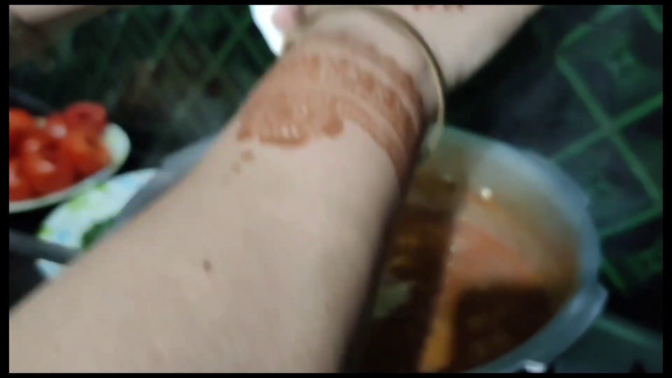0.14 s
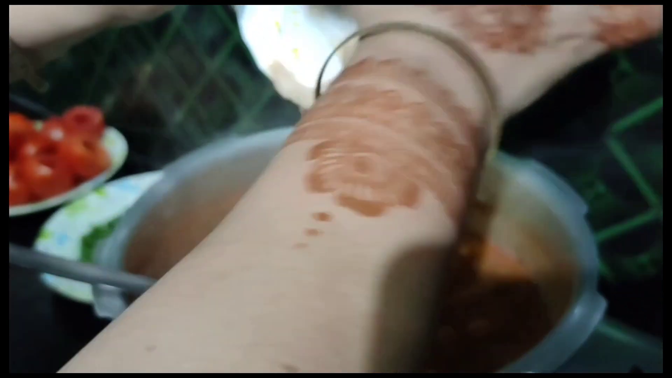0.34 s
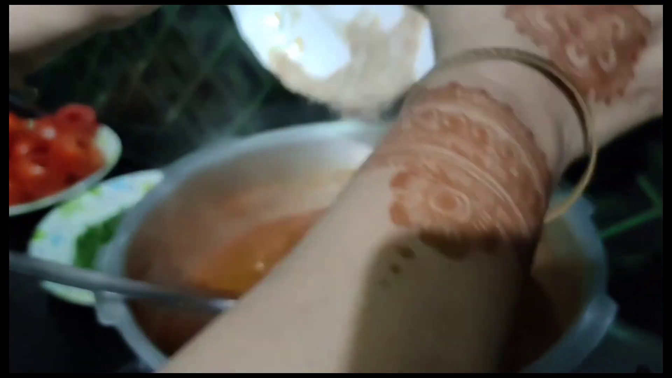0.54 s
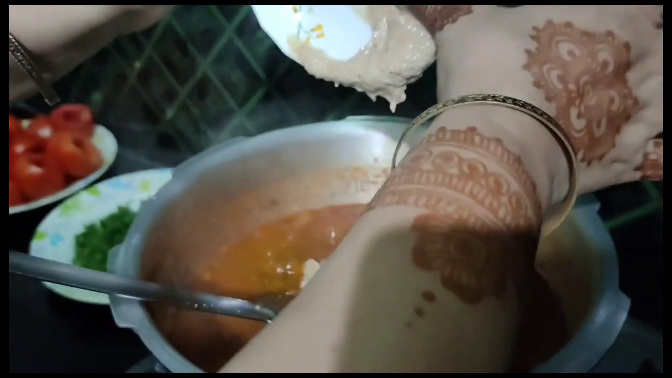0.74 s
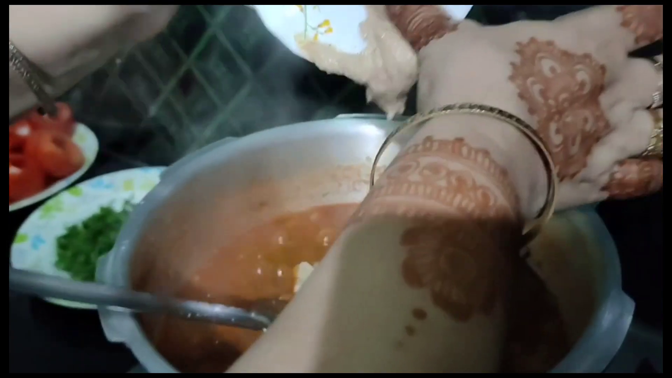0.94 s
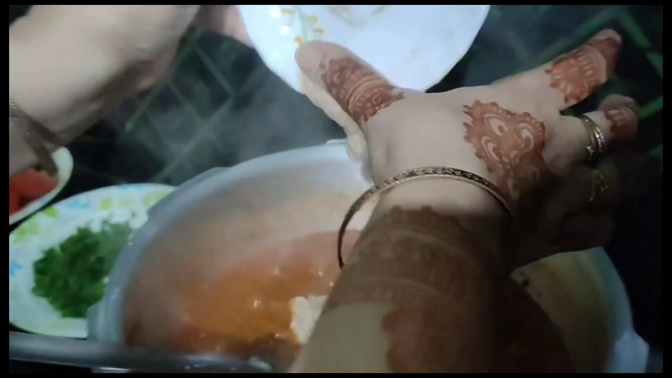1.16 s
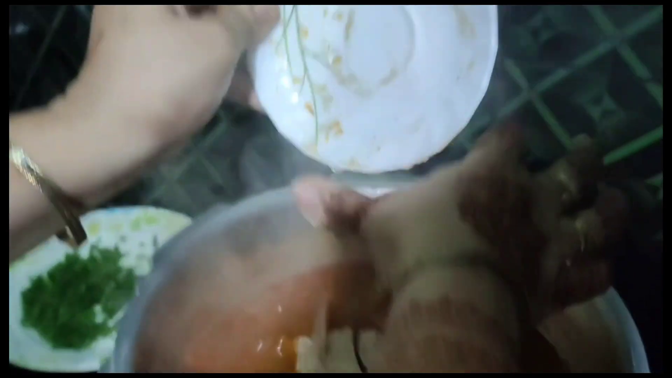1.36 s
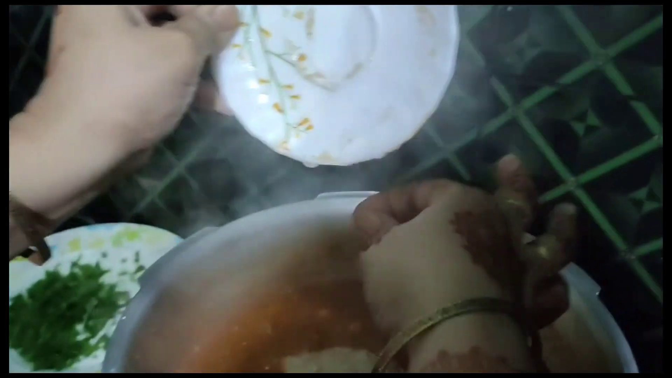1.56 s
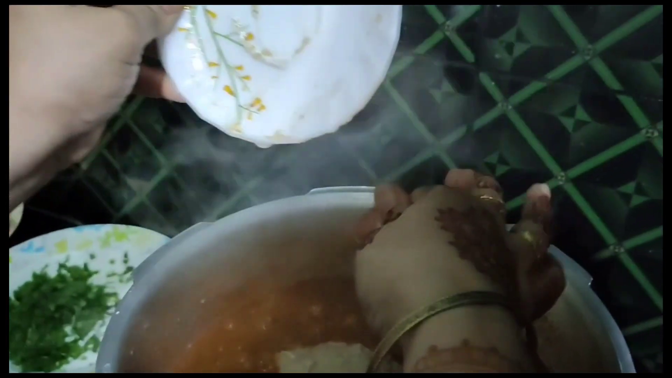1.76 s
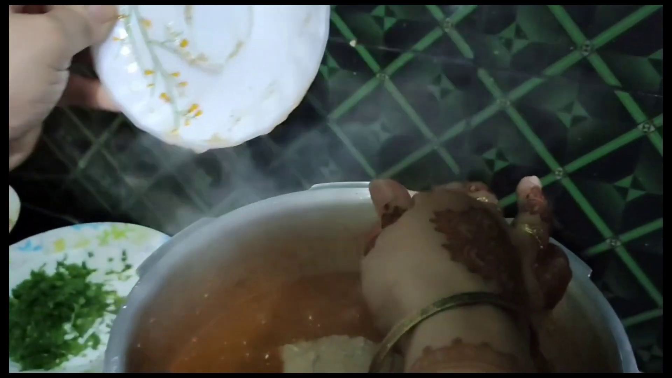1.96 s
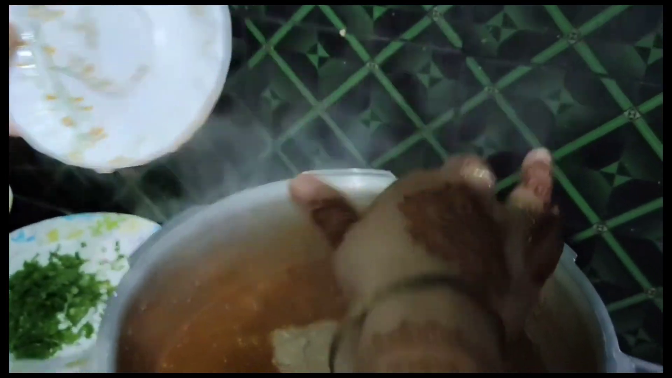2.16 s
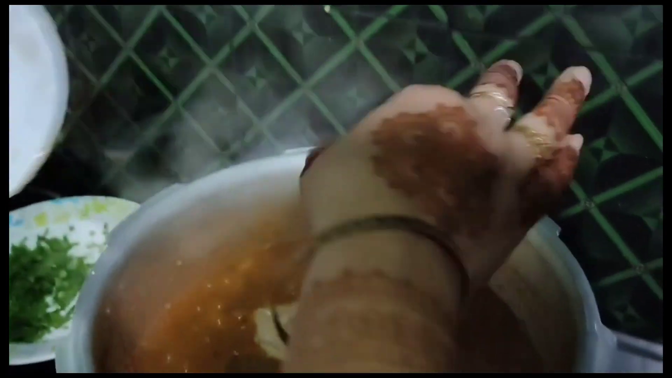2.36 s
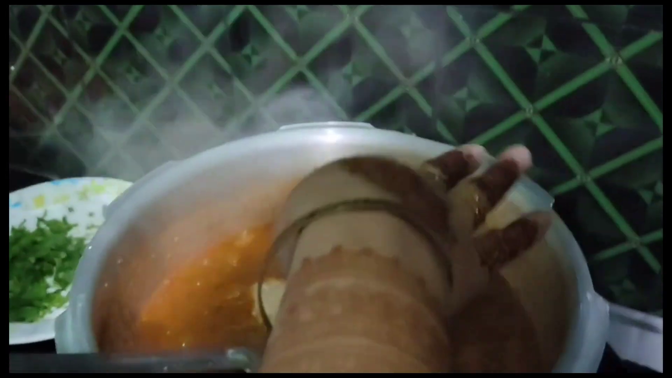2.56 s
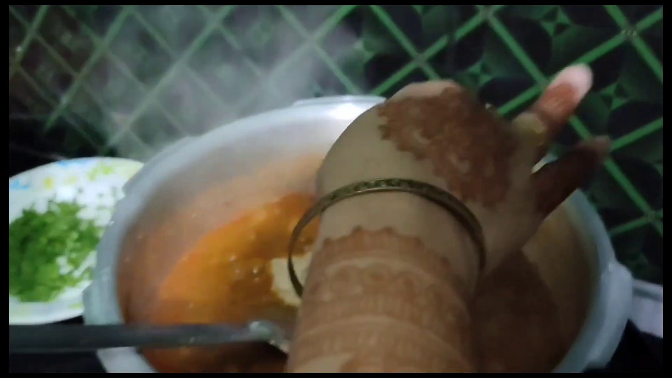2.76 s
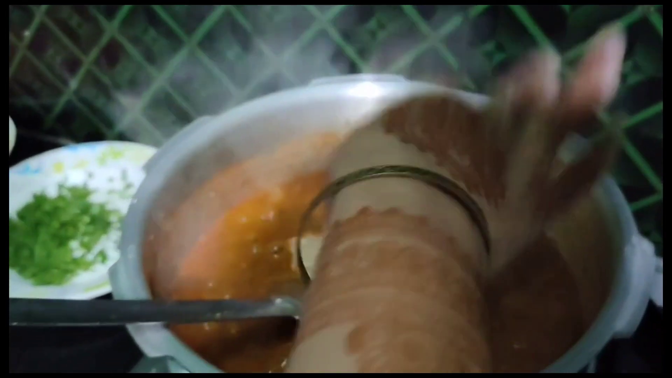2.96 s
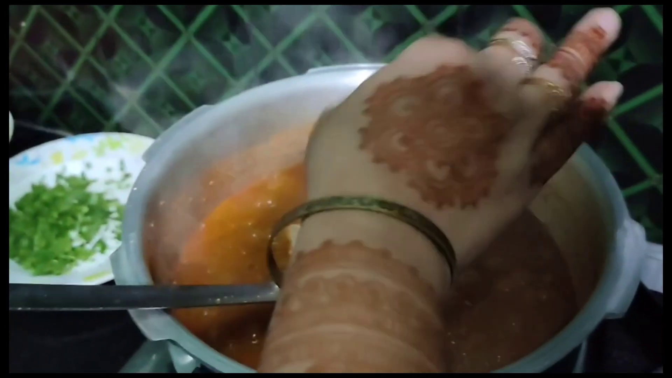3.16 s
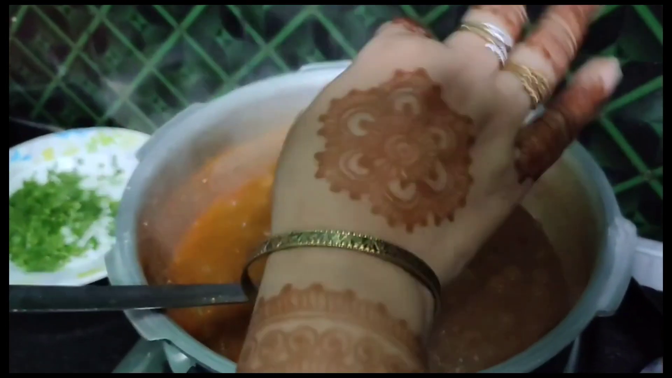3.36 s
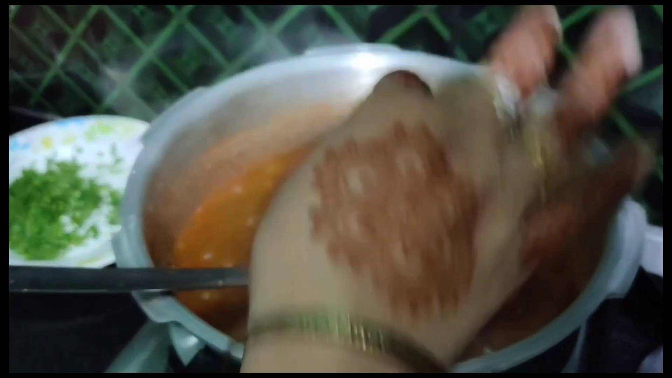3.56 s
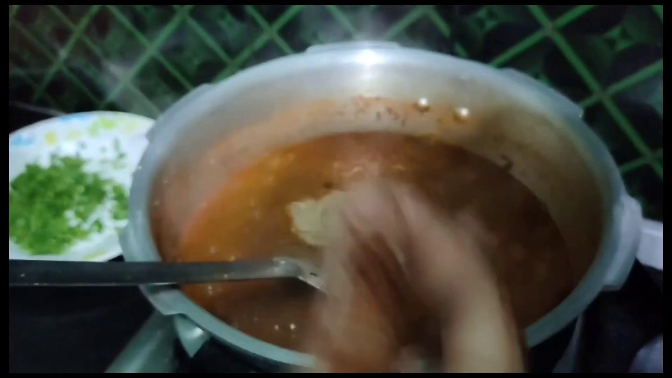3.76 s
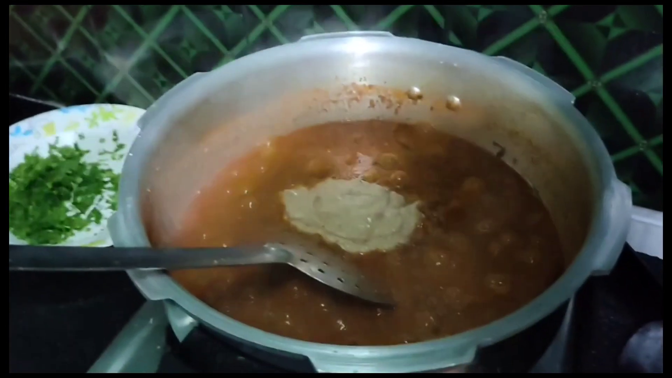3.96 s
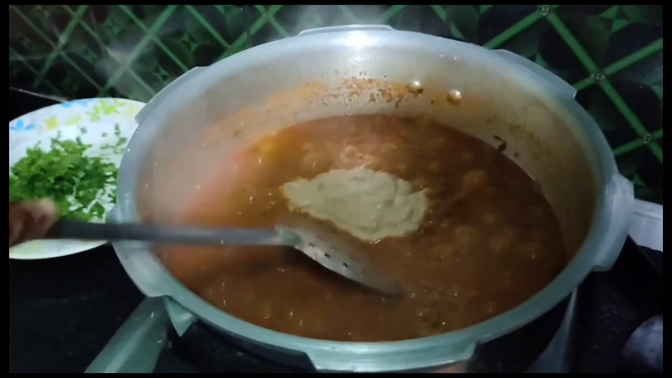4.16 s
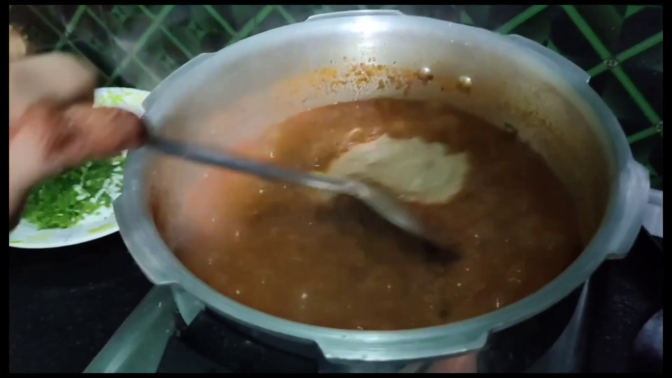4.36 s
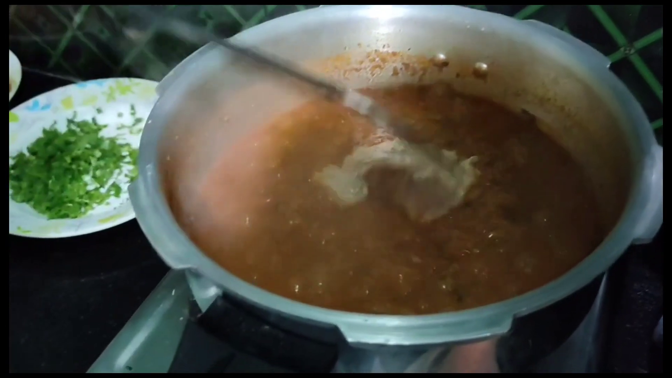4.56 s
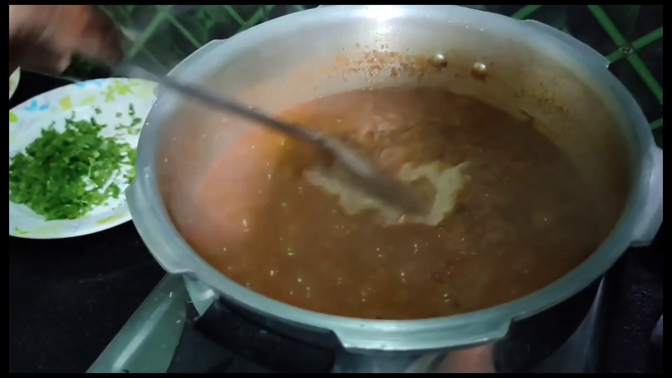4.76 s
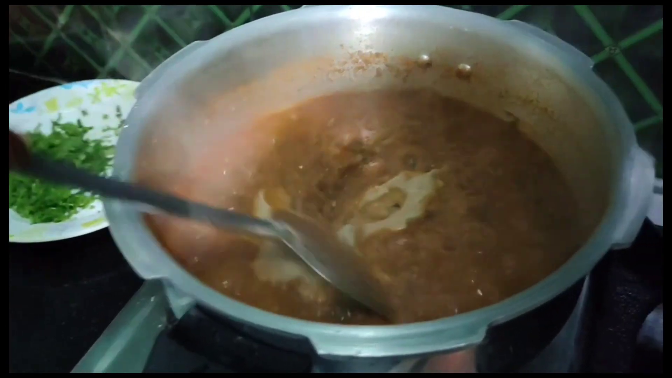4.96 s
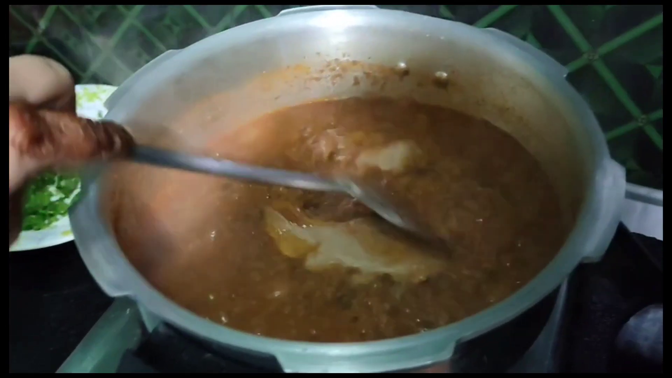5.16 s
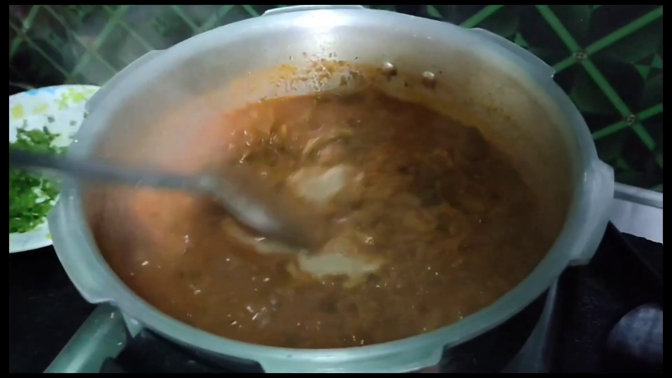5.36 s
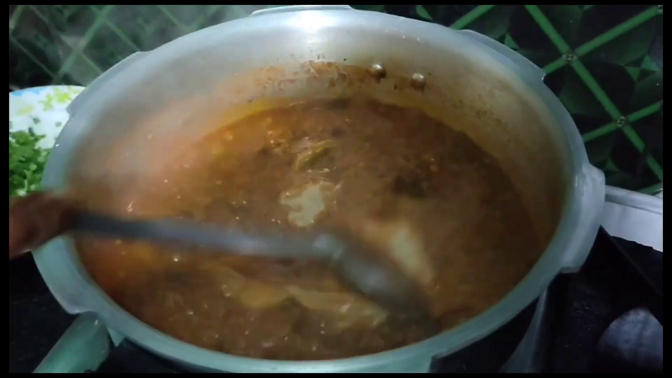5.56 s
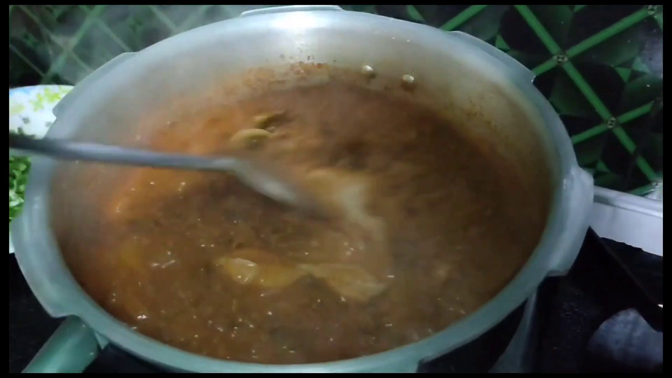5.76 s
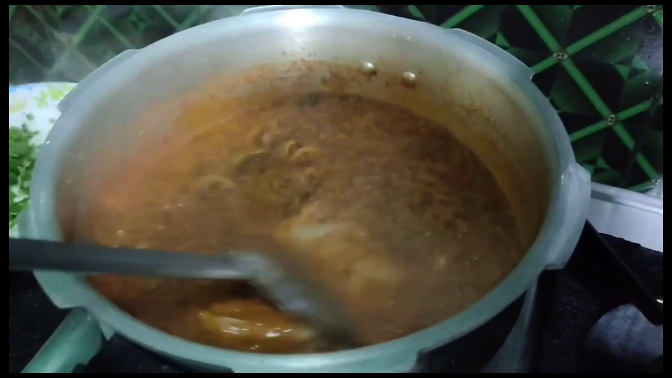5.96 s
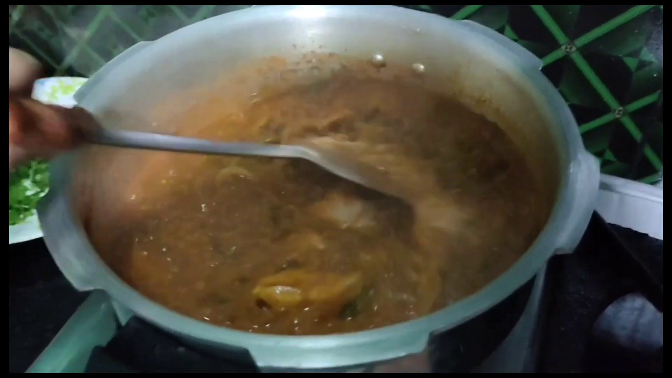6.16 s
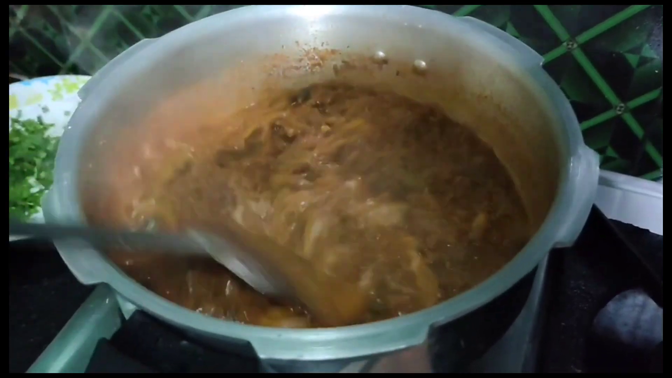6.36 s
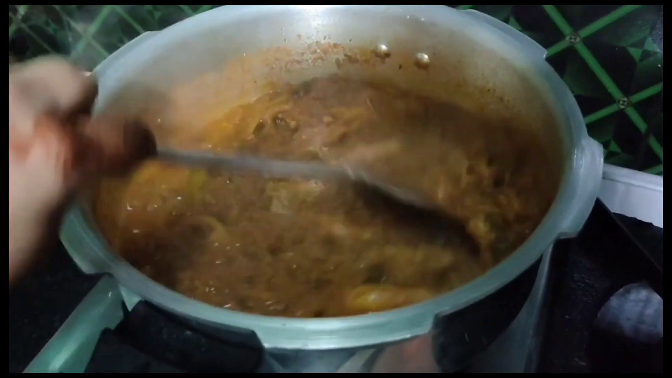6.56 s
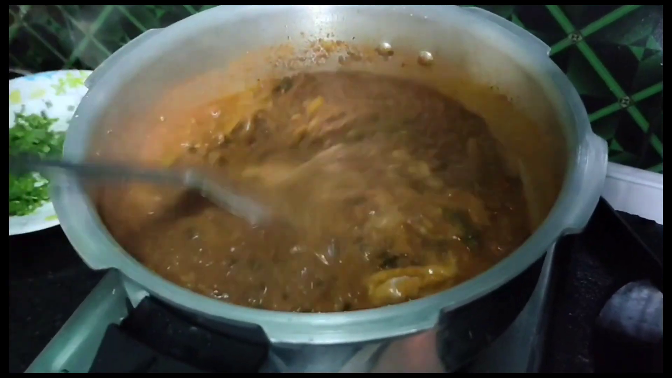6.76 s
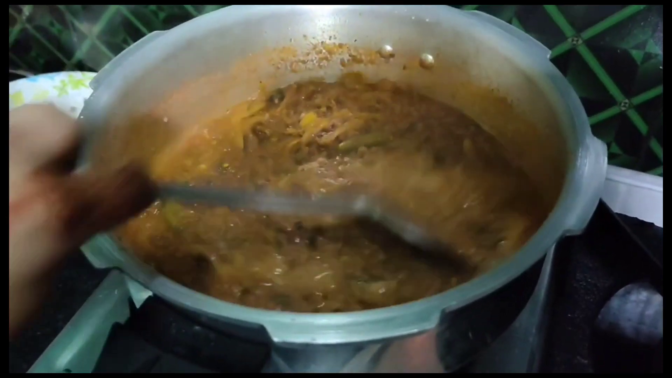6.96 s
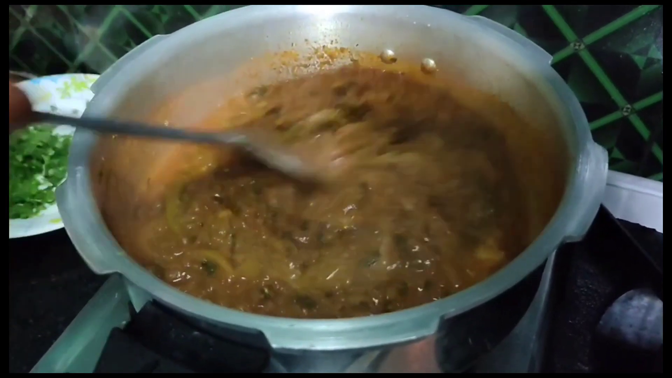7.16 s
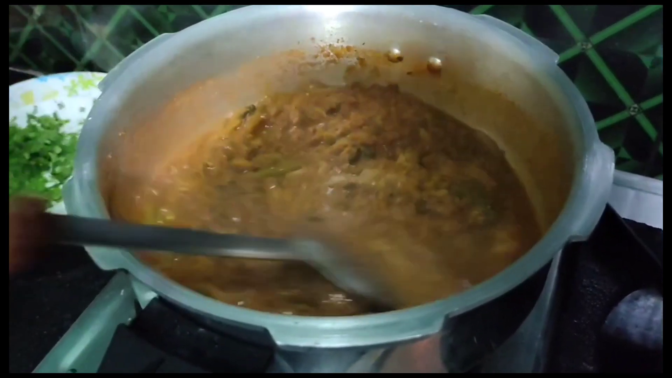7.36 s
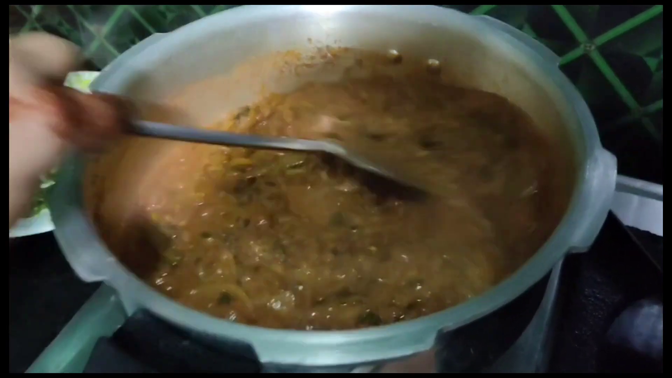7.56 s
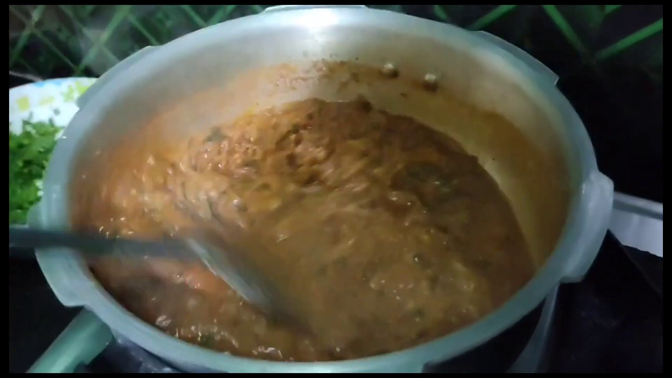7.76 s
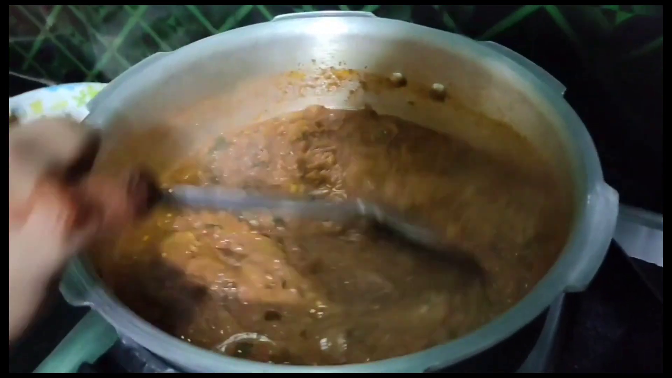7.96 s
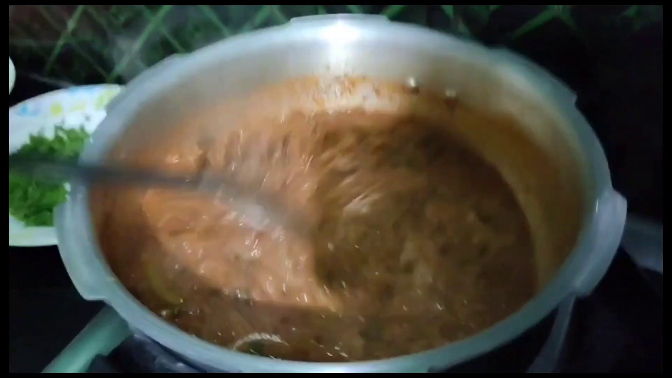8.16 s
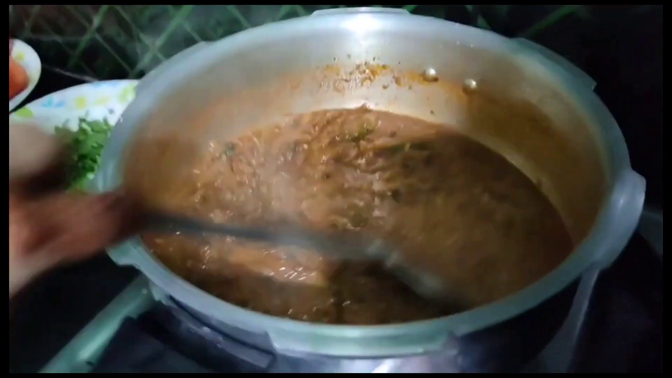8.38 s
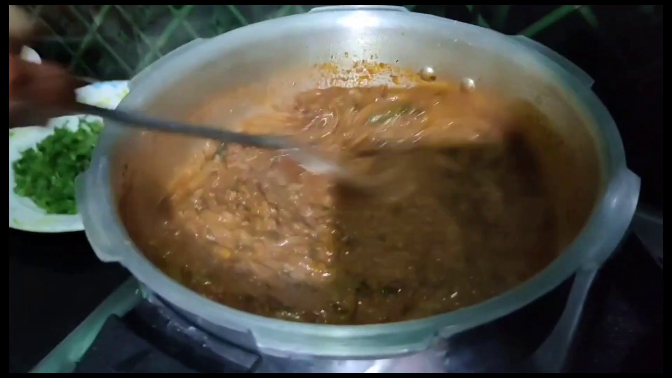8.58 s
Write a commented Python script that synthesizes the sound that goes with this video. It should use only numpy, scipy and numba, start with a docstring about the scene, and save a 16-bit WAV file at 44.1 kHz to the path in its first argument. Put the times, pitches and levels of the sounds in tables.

```python
"""In a tiled kitchen, mince curry simmers in an open aluminium pressure cooker, close to a phone.
Decaying sines make the bubbles and filtered random impulses the fizz and the spits of fat.
A hand shakes paste off its fingers and its bangle clinks twice on the metal, as a sum of damped modes.
Then a steel spoon stirs in circles: stick-slip impulses drive resonances as it scrapes the bottom,
pushes the wet mince along and knocks on the wall."""
import sys
import numpy as np
from scipy import signal
from scipy.fft import rfft, irfft
from scipy.io import wavfile
from scipy.ndimage import uniform_filter1d
from numba import njit

SR = 44100
rng = np.random.default_rng(int(sys.argv[2]) if len(sys.argv) > 2 else 0)


def digitize_waveform(pressure):
    """Quantize a signal to 16-bit integers and store it at the path in sys.argv[1].

    Rows of a 2-D input are taken as channels; values are limited to [-1, 1].
    """
    field = np.atleast_2d(pressure).T
    bounded = np.clip(field, -1, 1)
    quanta = np.round(bounded * 32767).astype(np.int16)
    wavfile.write(sys.argv[1], SR, quanta)


N = 380141
T = np.arange(N) / SR


def amp(db):
    """Decibel law: level in dB to amplitude ratio."""
    return 10 ** (np.asarray(db) / 20)


def unit(x):
    """Normalisation: scale to an rms of 1."""
    return x / np.sqrt(np.mean(x ** 2))


def add(track, s, sound):
    """Superposition: mix a sound into a track from time s on."""
    i = max(int(s * SR), 0)
    track[i:i + len(sound)] += sound[:max(N - i, 0)]


def colour(x, points, size=2048):
    """Minimum-phase filtering: a causal filter whose spectrum passes through (Hz, dB) points."""
    hz, db = np.transpose(points)
    f = np.maximum(np.fft.rfftfreq(size, 1 / SR), 1)
    cepstrum = irfft(np.log(amp(np.interp(np.log(f), np.log(hz), db))))
    # folding the cepstrum onto positive times makes the filter causal
    cepstrum[1:size // 2] *= 2
    cepstrum[size // 2 + 1:] = 0
    return signal.oaconvolve(x, irfft(np.exp(rfft(cepstrum))))[:len(x)]


def band(x, hz, width):
    """Simple resonance: one band-pass with gain 1 at its centre."""
    hz = min(hz, SR * .45)
    return signal.lfilter(*signal.iirpeak(hz, hz / width, fs=SR), x)


def body(x, modes):
    """Modal superposition: a parallel bank of (Hz, width Hz, dB) resonances."""
    return sum(amp(db) * band(x, hz, width) for hz, width, db in modes)


@njit
def moving_band(x, hz, width):
    """Time-varying resonance: a state-variable band-pass whose centre moves."""
    y, b, low = np.empty(len(x)), 0., 0.
    for i in range(len(x)):
        g, k = np.tan(np.pi * hz[i] / SR), width / hz[i]
        v = (b + g * (x[i] - low)) / (1 + g * (g + k))
        b, low, y[i] = 2 * v - b, low + 2 * g * v, k * v
    return y


def walk(rate):
    """Slow fluctuation: normal random values, rate per second, joined by straight lines."""
    knots = rng.standard_normal(2048)
    return np.interp(T * rate, np.arange(len(knots)), knots)


def clicks(rate, spread_db):
    """Impulsive excitation: random impacts, rate per second, with exponentially spread dB sizes; rms 1."""
    size = amp(spread_db * np.minimum(rng.exponential(size=N), 4))
    hits = rng.random(N) < rate / SR
    return unit(hits * size * np.sign(rng.standard_normal(N)))


def fade(t, t60):
    """Exponential damping: 60 dB down after t60 seconds."""
    return np.exp(-np.log(1000) * t / t60)


def swell(s, rise, fall):
    """Effort envelope: a rounded rise to 1 at time s and a fall after it."""
    t = T[::64]
    return np.interp(T, t, np.exp(-np.abs((t - s) / np.where(t < s, rise, fall)) ** 1.7 / 2))


def bubble(hz, cycles, glide):
    """Bubble resonance: a damped sine whose pitch rises by the glide fraction as it nears the surface."""
    life = cycles / hz
    t = np.arange(int(life * SR) + 2) / SR
    return np.sin(2 * np.pi * hz * t * (1 + glide * t / life / 2)) * fade(t, life)


def soft_start(note, hz):
    """Finite onset: a note grows to full strength over its first cycle."""
    return note * np.clip(np.arange(len(note)) * hz / SR, 0, 1)


def ports(mid, side, side_db):
    """Coherence of a spread source: it reaches the two ports alike in the bass, less alike higher up."""
    highpass = signal.butter(1, 850, "highpass", fs=SR, output="sos")
    side = amp(side_db) * signal.sosfilt(highpass, side)
    return np.array([mid + side, mid - side])


def kitchen(pair, early_db, tail_db):
    """Reverberation: direct sound plus two noise decays for early echoes and room, different at each port."""
    t = np.arange(SR // 3) / SR
    bandpass = signal.butter(1, [500, 9000], "bandpass", fs=SR, output="sos")
    sides = []
    for x, noise in zip(pair, rng.standard_normal((2, len(t)))):
        noise = signal.sosfilt(bandpass, noise) * (t > .001)
        # each decay has unit energy: quick echoes from pot and tiles, then the room
        early, tail = (unit(noise * fade(t, t60)) / np.sqrt(len(t)) for t60 in (.03, .3))
        sides.append(x + signal.oaconvolve(x, amp(early_db) * early + amp(tail_db) * tail)[:N])
    return np.array(sides)


# The pot shifts on the stove. Each row: start in seconds, peak in dB.
THUDS = [(0.514, -43), (2.471, -40), (3.167, -24), (3.543, -28), (6.789, -41), (7.242, -33), (7.75, -34.5),
         (8.305, -35)]


def thuds():
    """Low-frequency rocking: a short noise push under a low-pass, as the heavy pot rocks on its stand."""
    out, t = np.zeros(N), np.arange(SR // 4) / SR
    lowpass = signal.butter(4, 199.5, fs=SR, output="sos")
    for s, db in THUDS:
        push = rng.standard_normal(len(t)) * fade(t, 0.066)
        thud = signal.sosfilt(lowpass, push)
        add(out, s, amp(db) * thud / np.abs(thud).max())
    return out


def bubbles(count):
    """Random superposition: a swarm of small bubbles, 450 to 4950 Hz, most of them faint."""
    swarm = np.zeros(N)
    for when, pitch, size in rng.random((count, 3)):
        size_db = -4.2 * np.log(max(size, .07))
        add(swarm, when * N / SR, amp(size_db) * bubble(450 * 11 ** pitch, cycles=37.0, glide=0.12))
    return swarm


def spitting(hz):
    """Noise bursts: soft, dense spits of fat of one size, each a short decaying spray round one pitch."""
    bursts = np.abs(clicks(rate=70, spread_db=4.5))
    spray = signal.oaconvolve(bursts, fade(np.arange(2048) / SR, 0.018))[:N]
    return band(band(spray * rng.standard_normal(N), hz, hz / 2), hz, hz / 2)


# Spectrum of the small bubbles. Each row: frequency in Hz, relative level in dB.
BUBBLE_SPECTRUM = [(200, -25), (400, -12.5), (650, -7.5), (900, 1.5), (1300, -7.5), (2400, 2.5),
                   (3300, -8.5), (6000, -27), (15000, -36)]
# Spectrum of the fine fizz between them. Each row: frequency in Hz, relative level in dB.
FIZZ_SPECTRUM = [(200, -16.5), (300, 0), (600, 0.5), (1200, -7), (2400, -12.5), (3400, -20.5),
                 (5500, -24.5), (7000, -19), (10000, -26), (15000, -29.5)]
# Spits of fat, large to small. Each row: centre in Hz, level in dB.
SPITS = [(1500, -12), (2700, -16), (4500, -18.5), (7000, -22)]
# Air resonances of the open pot. Each row: centre in Hz, width in Hz, gain in dB.
CAVITY = [(326.5, 23, 4.5), (450, 28, -0.5), (691, 66, 2), (1240, 130, 5), (1790, 130, -3.5),
          (2360, 200, -9.5)]


def sauce():
    """Cavity resonance: bubbles, fizz and spitting fat are heard through the air in the pot; rms 1."""
    small = colour(bubbles(count=4500), BUBBLE_SPECTRUM)
    fizz = colour(clicks(rate=7000, spread_db=3.5), FIZZ_SPECTRUM) * amp(2.8 * walk(45))
    spits = sum(amp(db) * unit(spitting(hz)) for hz, db in SPITS)
    mix = amp(-3.0) * unit(small) + amp(0.5) * unit(fizz) + spits
    return unit(mix + body(mix, CAVITY))


# The simmer livens up, then calms as the cool paste is stirred in.
# Each row: time in seconds, level in dB.
SIMMER = [(0, -52), (1, -55), (1.7, -51.5), (2.9, -51.5), (4.1, -50.5), (4.8, -52), (6.5, -54.5),
          (7.3, -55.5), (7.6, -55), (8.27, -57), (8.62, -54)]


def simmer():
    """Extended source: the whole surface bubbles, partly unlike at the two ports."""
    s, db = np.transpose(SIMMER)
    return ports(sauce(), sauce(), side_db=-5) * amp(np.interp(T, s, db))


# Big bubbles burst through the thick sauce. Each row: start in seconds, peak of the ring in dB.
PLOPS = [(0.3, -36), (0.618, -31), (1.128, -36.5), (1.506, -43), (1.843, -43), (2.179, -35.5), (2.691, -39),
         (3.849, -38), (4.143, -35.5), (4.594, -37), (4.933, -35.5), (5.36, -35), (5.778, -35.5),
         (6.254, -39.5), (6.739, -34), (7.741, -35.5), (8.03, -42)]
PLOP_HZ, PLOP_SCATTER = 343, 0.044  # all ring the same air in the pot; the scatter is a fraction
PUFF_DB = -12.5  # relative to the ring


def plops():
    """Cavity excitation: a big bubble tears open with a noise puff and rings the air in the pot."""
    out, t = np.zeros(N), np.arange(4096) / SR
    for s, db in PLOPS:
        hz = PLOP_HZ * np.exp(PLOP_SCATTER * rng.standard_normal())
        puff = unit(band(band(rng.standard_normal(len(t)), 420, 550), 570, 830)) * fade(t, 0.14)
        add(out, s, amp(db + PUFF_DB) * puff * np.clip(t / 0.0014, 0, 1))
        add(out, s, amp(db) * soft_start(bubble(hz, cycles=15.2, glide=0.036), hz))
    return out


# Smaller bubbles, and air pockets that the spoon squeezes out.
# Each row: start in seconds, peak in dB, starting pitch in Hz.
POPS = [(0.711, -39, 1290), (0.998, -41, 1760), (1.115, -38, 1250), (1.264, -39, 1280), (1.512, -43, 1370),
        (1.715, -32.5, 1080), (1.846, -42, 1240), (2.26, -40, 890), (2.341, -35, 1680), (2.534, -34, 1180),
        (2.583, -36.5, 1780), (2.832, -31, 1790), (3.815, -39, 1250), (5.311, -47, 1150), (5.591, -37, 716),
        (6.754, -31.5, 1930), (7.035, -39.5, 687), (7.063, -27.5, 1960), (7.383, -48, 613),
        (7.43, -43, 1110), (7.609, -37, 460), (7.852, -34, 1200), (7.947, -34.5, 1190), (8.027, -37, 2250)]


def pops():
    """Bubble resonance: each small pocket of air gives one short rising note."""
    out = np.zeros(N)
    for s, db, hz in POPS:
        add(out, s, amp(db) * soft_start(bubble(hz, cycles=17, glide=0.077), hz))
    return out


# The sharpest spits of fat and spoon ticks. Each row: start in seconds, peak in dB, centre in Hz.
TICKS = [(0.997, -41, 1810), (1.1827, -48, 2900), (1.3957, -49, 2400), (1.653, -37.5, 1740),
         (1.7136, -45, 4200), (1.886, -54, 1900), (2.358, -46, 2560), (2.495, -47, 2900),
         (2.974, -38.5, 2220), (3.0094, -43.5, 2540), (3.876, -45, 3000), (4.0437, -42.5, 4260),
         (4.3346, -36.5, 1650), (4.6367, -43, 4600), (4.8495, -44.5, 2900), (5.704, -37, 2460),
         (6.3105, -33.5, 2600), (6.312, -36, 7300), (6.48, -50, 2020), (6.665, -35, 2530),
         (6.785, -38.5, 3160), (6.971, -41, 2470), (7.222, -34, 2070), (7.2453, -25.5, 9050),
         (7.602, -32.5, 2200), (7.763, -43.5, 5360), (8.486, -34.5, 2260)]


def ticks():
    """Transient noise: spits and light touches of the spoon are brief noise decays in one broad band."""
    out, t = np.zeros(N), np.arange(2048) / SR
    for s, db, hz in TICKS:
        burst = rng.standard_normal(len(t)) * fade(t, 0.021)
        tick = band(band(burst, hz, hz * 0.47), hz, hz)
        add(out, s, amp(db) * tick / np.abs(tick).max())
    return out


# The filled pot, heavily damped by the sauce. Each row: centre in Hz, width in Hz, gain in dB.
POT = [(463, 53, -1), (774, 54, 16), (1104, 132, 15), (1680, 120, -2.5), (2400, 73, 2.5), (2685, 130, 1.5)]


def pot(x):
    """Damped structural modes: a force on the metal excites the filled pot."""
    return body(x, POT)


# The spoon bumps the wall. Each row: start in seconds, peak in dB.
BUMPS = [(4.377, -35.5), (4.447, -28.5), (4.53, -36), (4.688, -34.5), (4.849, -37.5), (5.045, -37),
         (6.309, -36), (6.479, -42), (7.066, -34), (7.428, -36.5), (7.603, -30.5), (7.744, -35),
         (8.319, -43)]
# The spoon catches and judders under the sauce, briefly sounding two of the pot's resonances. # Each row: start
# in seconds, peak in dB, pitch in Hz, length in seconds.
JUDDERS = [(5.211, -37, 2400, 0.011), (5.2152, -27.5, 1100, 0.0098)]


def bumps():
    """Impulse response: knocks on the wall and at each landing ring the pot; judders are brief sines."""
    out, ring = np.zeros(N), band(pot(signal.unit_impulse(4096)), 670, 1500)
    landings = [(lands, knock_db) for lands, _, knock_db in CONTACTS]
    for s, db in BUMPS + landings:
        add(out, s, amp(db) * ring / np.abs(ring).max())
    for s, db, hz, length in JUDDERS:
        t = np.arange(int(length * SR)) / SR
        add(out, s, amp(db) * np.hanning(len(t)) * np.sin(2 * np.pi * hz * t))
    return out


# Metal ringing under the bangle. Each row: pitch in Hz, t60 in seconds, level in dB for a square blow,
# level in dB for a glancing blow, lasting share in dB.
METAL = [(1033, .25, -20, -28, -10), (1610, .56, -30, -11, -2), (1717, .22, -14, -26, -9),
         (1938, .2, -15, -26, -9), (2338, .3, -18, -19, -8), (2383, .3, -19, -19, -8),
         (2448, .3, -17, -18, -9), (2568, .28, -11, -18, -9), (2630, .4, -16, -21, -9),
         (2840, .25, -16, -18, -10), (3130, .25, -18, -24, -9), (3478, .32, -16, -30, -8),
         (3575, .42, -26, -22, -7), (3758, .22, -20, -20, -9), (4120, .24, -8, -9, -11),
         (4172, .33, -5, -14, -11), (4241, .45, -16, -5, -7), (4298, .36, -22, -8, -8),
         (4360, .28, -24, -15, -8), (4613, .23, -21, -21, -9), (4705, .36, -24, -25, -9),
         (4960, .22, -21, -36, -9), (5270, .22, -22, -45, -9), (5776, .27, -14, -45, -7),
         (5865, .22, -15, -45, -8), (6604, .2, -14, -15, -12), (6654, .34, -15, -11, -9),
         (6712, .24, -3, -7, -13), (6772, .36, -13, 0, -10), (6848, .3, -22, -3, -9),
         (6918, .42, -24, -12, -10), (7052, .34, -25, -19, -9), (7250, .33, -24, -17, -10),
         (7630, .3, -24, -27, -9), (8344, .35, -24, -34, -9), (8500, .22, -17, -32, -9),
         (8920, .3, -28, -32, -9), (9970, .26, -17, -27, -10), (10015, .32, -21, -17, -6),
         (10420, .25, -26, -21, -9), (11440, .35, -26, -40, -4), (13285, .17, -21, -25, -4),
         (13420, .27, -27, -26, -1), (14580, .21, -22, -30, -4), (14645, .26, -28, -25, -1)]
# Bangle blows. Each row: start in seconds, level in dB, glancing share from 0 to 1, clatter in dB,
# softness as a smoothing time in milliseconds.
CLINKS = [(3.168, -18, 0.1, -24.5, 0.022), (3.2478, -28, 0, -29, 0.054), (3.547, -18.5, 0.86, -24, 0.023),
          (3.5618, -24, 0.89, -32.5, 0.013)]
# Dense, short clatter of pot and spoon after a blow. Each row: frequency in Hz, relative level in dB.
CLATTER = [(250, -9), (600, -3.5), (1100, -4), (1800, 1.5), (2600, 4.5), (3400, 0.5), (4300, -3.5),
           (5400, -20), (6700, 1), (7900, -17), (10000, -17), (15000, -29)]
BUZZ_T60_S, BLOW_RISE_S = 0.2, 0.00099  # the bangle chatters briefly before the metal rings free
BEAM_DB = 1  # the higher modes beam toward the right port, the lowest toward the left


def clinks():
    """Modal ringing: a blow starts a fast, blurred drop while the bangle chatters, then a steady ring."""
    out, t = np.zeros((2, N)), np.arange(SR // 2) / SR
    hz, t60, square_db, glancing_db, lasting_db = np.transpose(METAL)[:, :, None]
    decay = fade(t, t60) * (amp(lasting_db) + fade(t, 0.055))
    beam_db = BEAM_DB * np.clip(np.log2(hz / 3100), -1, 1)
    start = rng.random((len(hz), 1))  # a new blow adds to the ring that is already there
    # each mode radiates its own pattern, so it reaches the two ports out of step
    lags = 0.96 * rng.standard_normal((2, len(hz), 1))
    for s, db, glancing, clatter_db, soft_ms in CLINKS:
        mode_db = square_db + np.clip(glancing, 0, 1) * (glancing_db - square_db)
        # the chatter shifts each mode's phase at random
        shifts = rng.standard_normal((len(hz), len(t))) * fade(t, BUZZ_T60_S)
        blur = 0.01 * np.cumsum(uniform_filter1d(shifts, size=12, axis=1), axis=1) * hz / 1000
        phase = 2 * np.pi * (hz * (t + s) + start) + blur
        mid, side_noise = (unit(colour(x, CLATTER)) for x in rng.standard_normal((2, len(t))))
        clatter = ports(mid, side_noise, side_db=-3.0) * (fade(t, 0.025) + amp(-8.5) * fade(t, 0.4))
        keep = np.exp(-1000 / (SR * max(soft_ms, .001)))
        for port, side, lag, rattle in zip(out, (-1, 1), lags, clatter):
            ring = np.sum(amp(mode_db + side * beam_db) * decay * np.sin(phase + lag), axis=0)
            blow = (amp(db) * ring + amp(clatter_db) * rattle) * np.clip(t / BLOW_RISE_S, 0, 1)
            add(port, s, signal.lfilter([1 - keep], [1, -keep], blow))
    return out


CIRCLE_S, WALL_ECHO_MS, WALL_SWING_MS, WALL_DB = .47, .9, 0.335, -4.5


def wall_echo(x):
    """Comb filtering: an echo off the pot's wall, its delay following the circling spoon, shifts the colour."""
    swing = np.sin(2 * np.pi * T / CIRCLE_S) + 0.28 * walk(6)
    delay_ms = WALL_ECHO_MS + WALL_SWING_MS * swing
    return unit(x + amp(WALL_DB) * np.interp(T - delay_ms / 1000, T, x))


# The steel spoon sings faintly as its edge rubs. Each row: centre in Hz, width in Hz, level in dB.
SPOON = [(2440, 120, 9), (2840, 120, 6), (3810, 85, -6), (4430, 260, -4), (5200, 110, -5), (6280, 160, -9),
         (6500, 200, 0.5), (7000, 140, -4), (7900, 260, -1.5), (8430, 200, -4)]
SPOON_BEND = 0.01  # the changing grip bends each pitch by about this fraction


def spoon_song():
    """Stick-slip friction: slips of the edge ring the spoon's modes, each of which drifts, comes and goes."""
    slips, song = clicks(rate=1500, spread_db=-1.5), 0
    for hz, width, db in SPOON:
        level = amp(db + 5.4 * walk(14))
        pitch = hz * np.exp(SPOON_BEND * walk(9))
        song = song + level * moving_band(slips, pitch, float(width))
    return unit(song)


def squelch(hollow_hz):
    """Moving cavity: crackling crumbs of mince and popping air ring the hollow behind the spoon."""
    crumbs = unit(clicks(rate=900, spread_db=1.0))
    wet = crumbs + amp(-5) * unit(bubbles(count=5000))
    broad = unit(moving_band(moving_band(wet, hollow_hz, 800.), hollow_hz, 1100.0))
    # the narrow, wet note of the hollow
    note = unit(moving_band(moving_band(crumbs, hollow_hz, 240.), hollow_hz, 900.0))
    return unit(broad + amp(-9) * note)


# The spoon lands on the bottom, drags round and lifts.
# Each row: landing in seconds, lift in seconds, knock on landing in dB.
CONTACTS = [(4.412, 4.493, -47), (4.997, 6.326, -36), (6.405, 7.261, -58), (7.333, 7.721, -40),
            (7.842, 8.21, -47), (8.326, 8.622, -40)]
# The spoon leans on the bottom and pushes through the mince, with light swipes on the way back.
# Each row: peak in seconds, lean-in in seconds, gritty hiss in dB, swish in dB, scrape on the pot in dB,
# slosh in dB, hollow pitch at the peak in Hz, push length in seconds.
STROKES = [(4.466, 0.12, -54, -47, -38.5, -84, 2200, 0.042),
           (5.213, 0.11, -60.5, -48.5, -45.5, -76, 2190, 0.06),
           (5.509, 0.042, -53, -56, -54, -77, 2530, 0.031), (5.62, 0.03, -52, -72, -53, -73, 2450, 0.02),
           (5.73, 0.071, -54, -47, -52.5, -73, 2130, 0.041),
           (5.956, 0.043, -51.5, -64, -57, -59, 2440, 0.045),
           (6.163, 0.11, -51.5, -46, -55.5, -61, 2100, 0.048),
           (6.43, 0.035, -61, -55, -76, -66, 2580, 0.01),
           (6.653, 0.26, -58, -43.5, -51, -54.5, 2260, 0.044),
           (6.817, 0.056, -61.5, -59, -74, -59, 2440, 0.018),
           (6.896, 0.015, -55, -49, -70, -70, 2750, 0.012),
           (7.103, 0.13, -52, -45.5, -54.5, -53.5, 2070, 0.051),
           (7.375, 0.051, -58.5, -53, -56, -49, 2450, 0.018),
           (7.575, 0.27, -58, -47, -53.5, -54.5, 2080, 0.048),
           (7.689, 0.024, -58.5, -63, -66, -58.5, 2000, 0.015),
           (7.87, 0.041, -61, -59.5, -64, -68, 2500, 0.038),
           (8.053, 0.16, -55.5, -44, -57, -50, 2080, 0.043),
           (8.326, 0.03, -59, -68, -70, -73, 2540, 0.0086),
           (8.43, 0.025, -58.5, -65, -65, -75, 2520, 0.015), (8.546, 0.1, -59, -47, -57, -57, 2090, 0.063)]
LAND_S, LIFT_S = 0.0011, 0.021  # how fast the edge bites and lets go
EASE_S, TOUCH_DB = 0.045, -58  # after each push the hand eases to a light touch, with this much hiss


def dragging():
    """Friction under load: the edge rubs while on the bottom, hardest going into each push."""
    touch = 0
    for lands, lifts, _ in CONTACTS:
        bite = np.clip((T - lands) / LAND_S, 0, 1)
        touch = touch + bite * np.exp(-np.maximum(T - lifts, 0) / LIFT_S)
    lean = np.max([amp(db) * swell(s, lean_s, EASE_S) for s, lean_s, db, *_ in STROKES], axis=0)
    return touch * (amp(TOUCH_DB) + lean)


# Hiss of the spoon's edge. Each row: frequency in Hz, relative level in dB.
GRIT = [(1000, 2), (2500, 11.5), (3700, -0.5), (4700, 0.5), (5700, -3), (6600, 5), (8000, -1.5),
        (10000, -4), (12500, -6.5), (15000, -6.5)]
DRAG_RING_DB, DRAG_SWISH_DB = -10.5, -20  # dragging alone rings the pot and moves some mince, re its hiss
SPOON_DB, SPOON_PUSH_DB = -10, -12.5  # the spoon's song under the drag and under each push
HOLLOW_SAG_PER_S, HOLLOW_WANDER = 1.83, .06  # the hollow rings lower as it opens; wander as a fraction
SLOSH_HZ, SLOSH_WIDTH_HZ = 422, 400
LUMP_DB = 1.9  # lumps of mince catch and give


def stirring():
    """Stick-slip and wet flow: the edge slips on the bottom; each push crackles mince and sloshes sauce."""
    drag = dragging()
    press, push, wave = amp(DRAG_RING_DB) * drag, amp(DRAG_SWISH_DB) * drag + 1e-9, 0
    pitch = 2600 * push  # the hollow's pitch is averaged by effort; 2600 Hz between pushes
    for s, _, _, swish_db, scrape_db, slosh_db, hz, length in STROKES:
        effort = swell(s, length, length)
        swish_effort = amp(swish_db) * effort
        press = press + amp(scrape_db) * effort
        push = push + swish_effort
        wave = wave + amp(slosh_db) * effort
        sagging_hz = hz * np.exp(-HOLLOW_SAG_PER_S * np.clip(T - s, -.12, .15))
        pitch = pitch + swish_effort * sagging_hz
    hollow_hz = pitch / push * np.exp(HOLLOW_WANDER * walk(45))
    # two independent versions of each texture: the middle and the side of the source
    swish = np.array([squelch(hollow_hz) for _ in range(2)])
    scrape = np.array([unit(band(pot(clicks(rate=1300, spread_db=2.0)), 1100, 2800)) for _ in range(2)])
    grit = np.array([wall_echo(colour(clicks(rate=3200, spread_db=0.5), GRIT)) for _ in range(2)])
    song = np.array([spoon_song() for _ in range(2)])
    song = song * (amp(SPOON_DB) * drag + amp(SPOON_PUSH_DB) * press)
    lap = band(clicks(rate=180, spread_db=6.5), SLOSH_HZ, SLOSH_WIDTH_HZ)
    slosh = unit(band(lap, SLOSH_HZ, SLOSH_WIDTH_HZ))
    wet = (scrape * press + swish * push) * amp(LUMP_DB * walk(55))
    rubbing = (grit * drag + song) * amp(2.0 * walk(50))
    return ports(*wet, side_db=-4) + ports(*rubbing, side_db=-9) + slosh * wave


def scene():
    """Superposition of sources: the pot on the stove and everything that touches it, in the kitchen."""
    cooking = simmer() + stirring() + plops() + pops() + ticks() + bumps() + thuds()
    bangle = clinks() * amp([[-1], [2.5]])  # the hand is to the right
    return kitchen(cooking, early_db=-24.5, tail_db=-13.5) + kitchen(bangle, early_db=-44, tail_db=-13.5)


# The phone's two ports have different resonances.
# Each row: frequency in Hz, left minus right in dB.
PORTS = [(380, -1), (700, 2), (1200, 0.5), (1750, 5.5), (2000, 6.5), (2400, 13), (2850, 9), (3500, 4),
         (4600, 8.5), (5700, -1), (6800, -10), (8200, -4), (10000, -0.5), (12500, 0), (15000, -9)]
TOP_HZ = 15850


def record(dry):
    """Receiver response: the phone colours each port, cuts the bass steeply and ends at the top."""
    left, right = (colour(x, [(hz, sign * db / 2) for hz, db in PORTS]) for x, sign in zip(dry, (1, -1)))
    left = left - 2 * band(left, 2540, 2200)  # the left port's resonance turns the phase
    both = np.array([left, right])
    thin = signal.sosfilt(signal.butter(12, 280, "highpass", fs=SR, output="sos"), both)
    lowpass = signal.ellip(10, .2, 70, TOP_HZ, fs=SR, output="sos")
    return signal.sosfilt(lowpass, thin + amp(-36) * both)  # a little bass remains


dry = scene()
out = record(dry)
digitize_waveform(out)
```